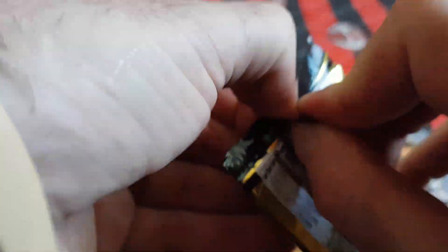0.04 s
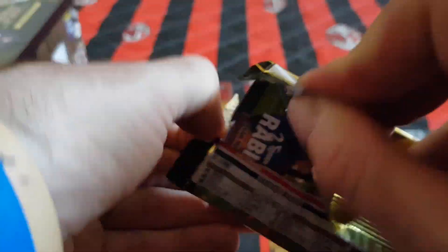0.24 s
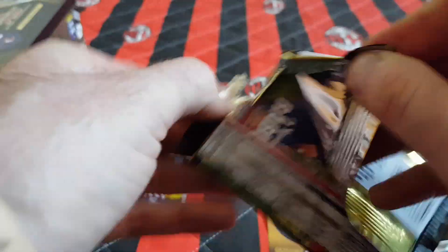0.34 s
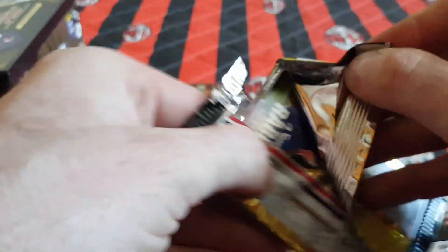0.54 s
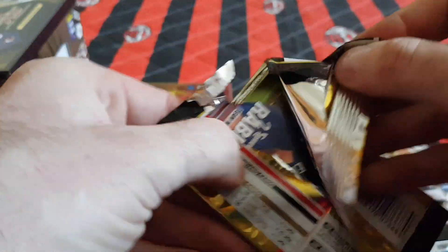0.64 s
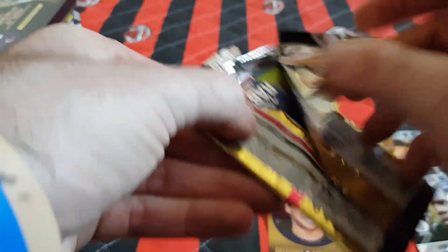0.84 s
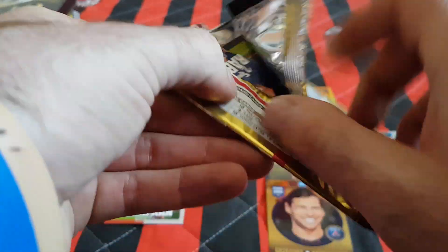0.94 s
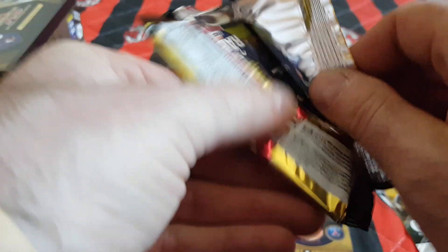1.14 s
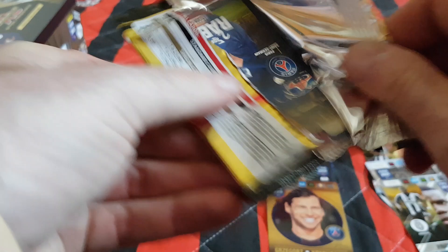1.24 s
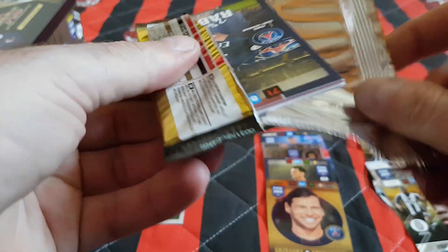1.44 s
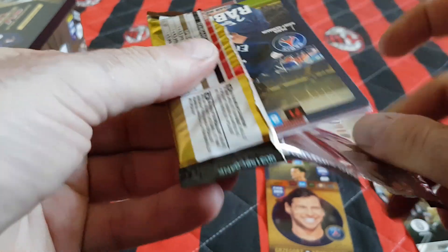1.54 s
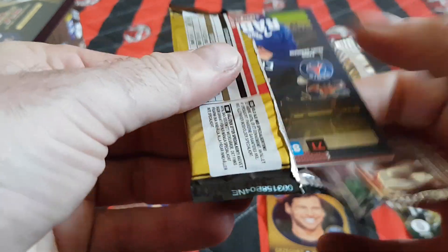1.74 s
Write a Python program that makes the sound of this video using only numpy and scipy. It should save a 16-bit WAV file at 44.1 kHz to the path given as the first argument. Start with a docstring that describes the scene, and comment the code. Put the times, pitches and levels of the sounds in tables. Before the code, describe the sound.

A foil card packet is torn open close by, crackling and snapping in a small room

```python
"""Over faint air and a wavering hum, hands tear open a foil card packet close by in a small room.
At once a fingertip squeaks on the seam: short damped rings, falling in pitch. Creases snap throughout, each a
click with its own ring, a few faint ones before the seam rips at 0.22 s in a dense run of clicks. Flexing foil
sheds swarms of tiny buckles, bright from the film and hollow from the pouch; fingers bump the cards as damped
sines. It is thickest near 1.3 s, then thins out; reflections, resonances and a short tail answer throughout."""
import sys
import numpy as np
from scipy import signal
from scipy.fft import rfft, irfft
from scipy.io import wavfile
from scipy.ndimage import uniform_filter1d

SR = 44100
rng = np.random.default_rng(int(sys.argv[2]) if len(sys.argv) > 2 else 0)


def dump(signal):
    """Clip the signal to [-1, 1] and save it as 16-bit WAV at the path in sys.argv[1]."""
    limited = np.clip(np.atleast_2d(signal).T, -1, 1)
    pcm = np.round(limited * 32767).astype(np.int16)
    wavfile.write(sys.argv[1], SR, pcm)


N = 79380  # 1.8 s
SIZE = 512  # samples in one click


def undb(db):
    """Decibels to gain."""
    return 10 ** (np.asarray(db) / 20)


def colour_db(points, size):
    """Spectrum in dB at every bin of a transform, drawn between points along log frequency."""
    hz, db = np.array(points).T
    bins_hz = np.fft.rfftfreq(size, 1 / SR)
    return np.interp(np.log(bins_hz + 1), np.log(hz), db)


def add(out, at_s, sound):
    """Mix a short sound in at a time."""
    start = int(np.clip(at_s * SR, 0, N - 1))
    out[:, start:start + sound.shape[-1]] += sound[..., :N - start]


# tone of the air, before its overall level: (frequency [Hz], level [dB])
AIR_TONE = [(20, -4), (60, -1), (180, 7.5), (400, -8.5), (1000, -11), (3000, -11), (8000, -32),
            (16000, -95)]
AIR_DB = -60


def air():
    """Faint steady room noise: coloured noise, partly shared by the two sides."""
    spectrum = rfft(rng.standard_normal((3, N))) * undb(colour_db(AIR_TONE, N))
    noise = irfft(spectrum, N)
    both = noise[0] + .5 * noise[1:]
    return undb(AIR_DB) * both / both.std()


HUM_HZ, HUM_DB, HUM_WAVER_DB, HUM_WAVER_S = 180, -64.5, 3.5, 0.023


def hum():
    """A faint low sine whose level and phase wander at random."""
    t = np.arange(N) / SR
    chance = rng.standard_normal(size=(2, 200))
    size, phase = (np.interp(t / HUM_WAVER_S, np.arange(len(row)), row) for row in chance)
    return undb(HUM_DB + HUM_WAVER_DB * size) * np.sin(2 * np.pi * HUM_HZ * t + phase)


# hollow between pouch and palm, and low room resonances: (frequency [Hz], t60 [s], peak gain [dB])
RESONANCES = [(190.7, 0.9, 5), (265.4, 0.75, -0.5), (375, 0.68, -3), (600, 0.19, -5), (678, .12, -9),
              (717, 0.2, -9), (1310, 0.033, -15), (1850, 0.17, -7)]
EARLY_DB, EARLY_S = -13, 0.0037  # energy and decay constant of the quick reflections
ROOM_DB, ROOM_T60_S, ROOM_TREBLE_T60_S = -12, 0.27, 0.26
LOW_APART, DIFFUSE_HZ = 0.37, 1020  # unlikeness of the low reflections; above this frequency they are unrelated


def room(x):
    """Quick reflections from hands and table, resonances and a short tail; the bass is much alike on both sides."""
    t = np.arange(SR // 2) / SR
    noise = rng.standard_normal((2, 3, len(t)))
    low_pass = signal.butter(2, DIFFUSE_HZ, fs=SR, output="sos")
    high_pass = signal.butter(2, DIFFUSE_HZ, "high", fs=SR, output="sos")
    low = signal.sosfilt(low_pass, noise[:, :1] + LOW_APART * noise[:, 1:])
    high = signal.sosfilt(high_pass, noise[:, 1:])
    early = (low[0] + high[0]) * np.exp(-t / EARLY_S) * (t > .0007)
    low_tail = low[1] * undb(-60 * t / ROOM_T60_S)
    high_tail = high[1] * undb(-60 * t / ROOM_TREBLE_T60_S)
    tail = (low_tail + high_tail) * (t > .006)
    response = np.zeros((2, len(t)))
    for db, part in ((EARLY_DB, early), (ROOM_DB, tail)):
        response = response + undb(db) * part / np.sqrt((part ** 2).sum() / 2)
    for hz, t60, db in RESONANCES:
        damping = np.log(1000) / t60
        ring = np.exp(-damping * t) * np.cos(2 * np.pi * hz * t)
        response = response + undb(db) * 2 * damping / SR * ring
    return x + signal.fftconvolve(x, response, axes=1)[:, :N]


# fingers bumping the stack of cards: (time [s], envelope peak before pan and room [dB], pitch [Hz])
CARD_BUMPS = [(0.247, -28.5, 322), (0.281, -40.5, 196), (0.441, -55, 193), (0.593, -51, 90),
              (0.766, -39.5, 192), (.82, -47, 139), (1.079, -47.5, 95), (1.298, -38, 143),
              (1.323, -54, 173), (1.36, -50, 275), (1.387, -37.5, 103), (1.479, -38.5, 241),
              (1.579, -40.5, 302), (1.719, -49, 203)]
BUMP_DECAY_S = 0.004  # at 150 Hz; shorter for higher knocks


def bumps():
    """Soft, heavily damped knocks of fingers on the cards: sines that swell and die within a few cycles."""
    out, t = np.zeros((2, N)), np.arange(SR // 10) / SR
    for s, db, hz in CARD_BUMPS:
        decay = BUMP_DECAY_S * 150 / hz
        swell = t / decay * np.exp(1 - t / decay)
        add(out, s, undb(db) * np.sin(2 * np.pi * hz * t) * swell)
    return out


SQUEAK_END_S, SQUEAK_PER_S, SQUEAK_DECAY_S, SQUEAK_DB = .088, 160, 0.0011, -38.5
SQUEAK_HZ, SQUEAK_SAG_HZ_PER_S = 2700, 5200  # starting pitch and its fall


def squeak():
    """A fingertip sticks and slips on the seam: each slip is a short damped ring, the pitch sagging."""
    out, t = np.zeros((2, N)), np.arange(SIZE) / SR
    slips = rng.standard_normal(size=(30, 3))[:int(SQUEAK_END_S * SQUEAK_PER_S)]
    for k, (late, size, pitch) in enumerate(slips):
        s = (k + .5 + 0.144 * late) / SQUEAK_PER_S
        hz = (SQUEAK_HZ - SQUEAK_SAG_HZ_PER_S * s) * (1 + .03 * pitch)
        ring = np.sin(2 * np.pi * hz * t) * np.exp(-t / SQUEAK_DECAY_S)
        add(out, s, undb(SQUEAK_DB + 2 * size) * ring)
    return out


RING_OCTAVES, RIPPLE_DB = 0.36, 2.5  # width of a facet's ring; unevenness of its spectrum
APART_HZ = 3120  # above this the two microphones hear each facet differently
DISPERSION_S = 0.00046  # delay at 1 kHz: in bending waves the lows of a click arrive after its highs
PORT_LAG_S = .00006  # spread of the arrival time between the two microphones, from facet to facet


def buckles(colour, ring_hz, ring_db, tilt_db):
    """Unit-energy clicks of foil facets: a broad ring, a tilt and uneven radiation to the two microphones."""
    count = len(ring_hz)
    hz = np.fft.rfftfreq(SIZE, 1 / SR) + 40
    octave = np.log2(np.maximum(hz, 400) / 3000)
    db = colour_db(colour, SIZE) + tilt_db[:, None] * octave
    db = db + ring_db * np.exp(-.5 * (np.log2(hz / ring_hz[:, None]) / RING_OCTAVES) ** 2)
    # spectral ripple: shared in the lows, separate for each microphone in the highs
    chance = uniform_filter1d(rng.standard_normal((count, 3, len(hz))), size=6, axis=-1) * np.sqrt(6)
    apart = hz ** 2 / (hz ** 2 + APART_HZ ** 2)
    ripple = np.sqrt(1 - apart) * chance[:, :1] + np.sqrt(apart) * chance[:, 1:]
    db = db[:, None] + RIPPLE_DB * ripple
    # folding the cepstrum gives minimum phase: energy gathers at the start of the click
    cepstrum = irfft(np.log(undb(db)))
    cepstrum[..., 1:SIZE // 2] *= 2
    cepstrum[..., SIZE // 2 + 1:] = 0
    turn = rng.standard_normal((count, 2, 1)) * 1.22 * apart  # phase [rad]
    turn = turn - 4 * np.pi * DISPERSION_S * np.sqrt(hz * 1000)
    lag_s = PORT_LAG_S * rng.standard_normal((count, 1, 1)) * np.array([[.5], [-.5]])
    turn = turn + 2 * np.pi * hz * lag_s
    click = irfft(np.exp(rfft(cepstrum) + 1j * turn))
    click = np.roll(click, SIZE // 64, axis=-1)  # room for what the phase moved ahead of the start
    click *= rng.choice([-1, 1], (count, 1, 1))
    return click / np.sqrt((click ** 2).sum(-1).mean(-1))[:, None, None]


FACET_RING_DB = 7.5  # ring strength, the same for all facets
TILT_SPREAD_DB = 1.44  # spread of the tilt per octave, from facet to facet


def swarm(colour, per_s, scatter_db, strength):
    """Tiny buckles at random moments, each from one of 300 facets; their size follows the strength."""
    out = np.zeros((2, N))
    facets = rng.standard_normal(size=(300, 2))
    ring_hz = 2500 * 2 ** facets[:, 0]
    clicks = buckles(colour, ring_hz, FACET_RING_DB, TILT_SPREAD_DB * facets[:, 1])
    chance = rng.random(size=(16000, 3))[:int(per_s * N / SR)]
    sizes = undb(scatter_db * np.minimum(-np.log(chance[:, 1]), 3))
    sizes *= np.sqrt(N / np.sum(sizes ** 2))  # unit power at strength 1
    for k, (when, _, which) in enumerate(chance):
        s = (k + 2 * when) / per_s
        level = sizes[k] * strength[min(int(s * SR), N - 1)]
        add(out, s, level * clicks[int(which * len(clicks))])
    return out


ATTACK_S, RELEASE_S = 0.0036, 0.015


def envelope(start_s, end_s, release_s):
    """Attack, hold and release of one movement of the hands."""
    t = np.arange(N) / SR
    attack = np.clip((t - start_s) / ATTACK_S + 1, 0, 1)
    return attack * np.exp(-np.maximum(t - end_s, 0) / release_s)


# flexes of the wrapper, levels before trim:
# (start [s], end [s], bright crackle level [dB], hollow crumple level [dB])
WRAPPER_FLEXES = [(0, 0.065, -51, -60.5), (0.102, 0.123, -50.5, -66), (0.197, .212, -49, -58),
                  (0.236, 0.24, -35, -40), (0.247, 0.251, -27.5, -29), (0.248, 0.302, -34, -35.5),
                  (0.321, 0.322, -37, -39), (0.367, 0.421, -46.5, -55.5), (0.391, .408, -37.5, -40),
                  (0.446, 0.462, -49, -43.5), (0.497, 0.509, -49, -43), (0.536, 0.619, -44, -44),
                  (0.639, 0.661, -37, -45), (0.683, 0.738, -79, -52), (0.724, 0.748, -42, -43),
                  (0.755, 0.776, -31, -32.5), (0.776, 0.817, -32.5, -32), (.84, .895, -71, -51.5),
                  (0.92, 0.947, -37.5, -43.5), (0.97, 0.994, -45.5, -45), (1.014, 1.022, -43, -39),
                  (1.036, 1.13, -47, -52), (1.081, 1.089, -56, -39.5), (1.156, 1.173, -45, -66),
                  (1.195, 1.267, -38, -46), (1.277, 1.291, -54, -31), (1.298, 1.389, -30, -24),
                  (1.392, 1.436, -51, -40.5), (1.46, 1.508, -51, -41), (1.53, 1.526, -41, -50),
                  (1.557, 1.612, -79, -51.5), (1.71, 1.724, -46, -42), (1.775, 1.803, -59, -58.5)]
FLUTTER_S, FLUTTER_DB = .004, 2  # the level wanders at random every few milliseconds


def flexing(levels_db):
    """Strength of all flexes together: their powers add, with a random flutter of level."""
    power = np.zeros(N)
    for (start_s, end_s, _, _), db in zip(WRAPPER_FLEXES, levels_db):
        power += (undb(db) * envelope(start_s, end_s, RELEASE_S)) ** 2
    chance = rng.standard_normal(size=2000)
    wander = np.interp(np.arange(N) / SR / FLUTTER_S, np.arange(len(chance)), chance)
    flutter = undb(FLUTTER_DB * wander)
    return np.sqrt(power / np.mean(flutter ** 2)) * flutter


# hollow tone of the pouch, relative: (frequency [Hz], level [dB])
POUCH_TONE = [(40, -46), (150, -4), (430, 0), (650, 5), (1000, 1), (1650, 0.5), (2100, -9.5), (2800, -5),
              (4000, -6), (16000, -40)]
POUCH_PER_S, POUCH_DB, POUCH_SCATTER_DB = 850, -1.5, 4.5  # POUCH_DB trims the flex levels


def pouch():
    """Hollow crumple: the pouch sheds a sparser swarm of dull buckles at each flex."""
    levels_db = np.array(WRAPPER_FLEXES)[:, 3] + POUCH_DB
    return swarm(POUCH_TONE, POUCH_PER_S, POUCH_SCATTER_DB, flexing(levels_db))


# bright tone of the film, relative: (frequency [Hz], level [dB])
FILM_TONE = [(100, -35), (1000, -25.5), (2500, 2.5), (3800, -2.5), (7400, 3.5), (9200, -9), (11500, -5),
             (14000, -5), (16000, -27)]
FILM_PER_S, FILM_DB, FILM_SCATTER_DB = 2200, -1, 8.5  # FILM_DB trims the flex levels


def film():
    """Bright crackle: the film sheds a dense swarm of very uneven buckles at each flex."""
    levels_db = np.array(WRAPPER_FLEXES)[:, 2] + FILM_DB
    return swarm(FILM_TONE, FILM_PER_S, FILM_SCATTER_DB, flexing(levels_db))


# tone of the tearing seam, relative: (frequency [Hz], level [dB])
RIP_TONE = [(150, -21.5), (700, -6.5), (1500, 3.5), (3500, 0.5), (7000, 4), (9200, -5.5), (13000, 4.5),
            (16000, -9)]
RIP_START_S, RIP_END_S, RIP_RELEASE_S, RIP_PER_S, RIP_DB = 0.2158, 0.2245, 0.012, 5700, -21.5


def rip():
    """The seam gives way in one fast run of fairly even little fractures."""
    strength = envelope(RIP_START_S, RIP_END_S, RIP_RELEASE_S)
    return undb(RIP_DB) * swarm(RIP_TONE, RIP_PER_S, scatter_db=4.0, strength=strength)


# tone shared by the creases, relative: (frequency [Hz], level [dB])
SNAP_TONE = [(60, -13.5), (250, -17.5), (450, -5.5), (660, -5.5), (1800, 2.5), (3900, 0.2), (7000, 3.5),
             (9200, -8.5), (12000, -2.5), (16000, -8.5)]
# single creases snapping through:
# (time [s], energy before trim [dB], ring of the facet [Hz], ring strength [dB], tilt [dB per octave])
CREASE_SNAPS = [(0.0414, -12.5, 950, 9, 10.5), (0.098, -12.5, 11600, 11.5, 1.5),
                (0.1725, -16.5, 3950, 5.5, 1.5), (0.2024, -15.5, 3520, -4, -1), (0.2468, 1.5, 990, 9, 0.5),
                (0.2502, 1.5, 970, 3, -2.5), (0.2653, -2, 2870, -3, -1.5), (0.3025, 1.5, 660, 6, 2.0),
                (0.377, -9.5, 5820, 12, 2.0), (0.3896, -12, 13000, 5, 10), (0.3946, -3.5, 910, 15, -0.5),
                (0.4258, -15, 770, 8, 7), (0.5155, -16.5, 1880, -2, -3), (0.534, -12, 11300, 18, 2.5),
                (0.5477, -4.5, 733, 15, -1.5), (0.5641, -11, 12500, 17, -3.5),
                (0.5904, -5, 5100, 8.5, -0.5), (0.5938, -4.5, 11900, 15, 0), (0.6547, -9.5, 12500, 0, 4),
                (0.6883, -6.5, 640, 13.5, 2), (0.709, -6, 730, 16.5, -3), (0.7271, -11.5, 660, 9, -0.5),
                (0.7337, -7.5, 7650, 9, 3), (0.7476, -9, 9050, 6, 1.5), (0.7625, -2.5, 890, 14, 3),
                (0.8164, -5, 1820, 5, -2.0), (0.8357, -2.5, 1360, 7, -5.5), (0.8726, -5, 850, 16, 0.5),
                (0.8987, 3, 660, 3.5, -1), (0.9104, -0.5, 6630, 6.5, -0.5), (0.9385, -6.5, 6370, -1, 3),
                (1.0184, -7, 1790, 9.5, 1.5), (1.1018, -5, 1600, 2.5, -3), (1.117, -13, 2570, 10, -2),
                (1.1233, -5.5, 4530, 12, 1), (1.138, -7, 1320, 19, 1), (1.145, 0.5, 2600, 12, -1),
                (1.1481, -3.5, 7060, 8.5, -1.5), (1.2035, -0.5, 2820, 13, 0), (1.244, -2, 2560, 13.5, 0),
                (1.2849, -0.5, 7200, 2, -1), (1.2952, 4.5, 7750, 14.5, 2.5), (1.3107, 6.5, 1450, 10, -2),
                (1.3176, 1.5, 835, 14, 0.5), (1.3232, -1, 2500, 12, 1.5), (1.3473, 1.5, 620, 5, -1.5),
                (1.3563, 0.5, 10500, 10, -4.5), (1.3646, 1.5, 1010, 4, -3), (1.3723, 1.5, 900, 8, 6),
                (1.3789, 2.5, 1580, 3.5, -5), (1.3886, 1, 770, 6, -4.5), (1.4746, -8, 1410, 5.5, -4.5),
                (1.4887, -8, 1560, 6, 3), (1.5006, -9, 1570, 20, 0), (1.524, -7.5, 3140, 9.5, -2.5),
                (1.5308, -2.5, 3500, 2.5, -2), (1.5792, -9.5, 12800, 13, -2),
                (1.6888, -11.5, 1930, 10.5, 0), (1.7759, -19, 1940, 15, 2)]
SNAP_DB = -1.5  # trim of the main clicks
BLUR_DB, BLUR_S = -14.5, .0012  # trim and time scatter of the weaker clicks that blur each snap's edge


def snaps():
    """The loud creases, each with its own ring and brightness; three weaker clicks around each blur its edge."""
    out = np.zeros((2, N))
    at, db, hz, ring_db, tilt = np.array(CREASE_SNAPS, float).T
    shape = SNAP_TONE, hz, ring_db[:, None], tilt
    for s, gain, click in zip(at, undb(db + SNAP_DB), buckles(*shape)):
        add(out, s, gain * click)
    for lags in rng.standard_normal(size=(3, len(at))):
        for s, gain, click in zip(at + BLUR_S * lags, undb(db + BLUR_DB), buckles(*shape)):
            add(out, s, gain * click)
    return out


# path of the packet in front of the microphones: (time [s], left minus right level [dB])
PACKET_PAN = [(0, 3.5), (.4, 3.5), (.75, 2), (1.1, 4), (1.29, 5), (1.4, 1.5), (1.55, 1), (1.8, -2)]


def scene():
    """The packet moves a little in front of the microphones; the room answers it, over air and hum."""
    bright = film()
    hollow = pouch()
    packet = snaps() + rip() + bright + hollow + squeak() + bumps()
    pan_db = np.interp(np.arange(N) / SR, *np.array(PACKET_PAN).T)
    panned = packet * undb(np.array([pan_db, -pan_db]) / 2)
    return room(panned) + air() + hum()


CEILING, TOP_HZ = .9, 16200  # peak limit before the treble cut (full scale 1); edge of the cut


def record(dry):
    """Round the very tallest peaks and cut the top of the treble steeply."""
    rounded = dry / (1 + (dry / CEILING) ** 4) ** .25
    return signal.sosfilt(signal.ellip(8, .2, 80, TOP_HZ, fs=SR, output="sos"), rounded)


dry = scene()
out = record(dry)
dump(out)
```